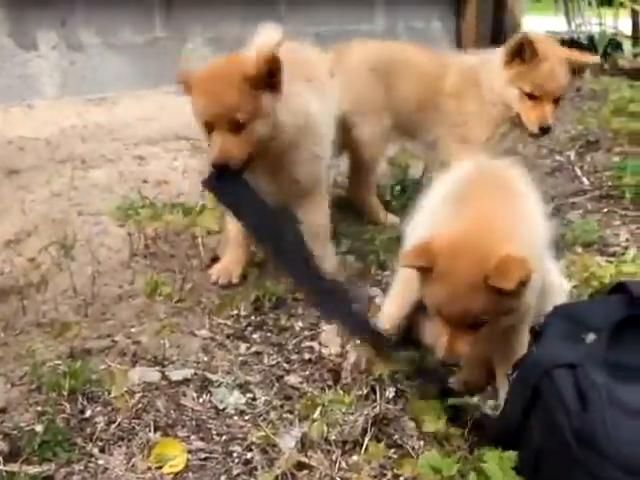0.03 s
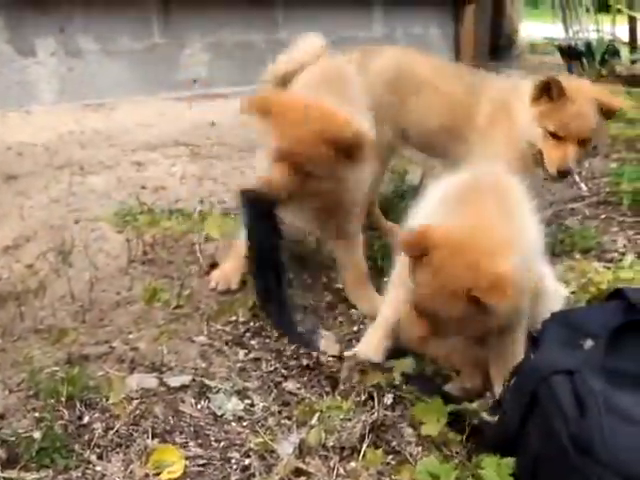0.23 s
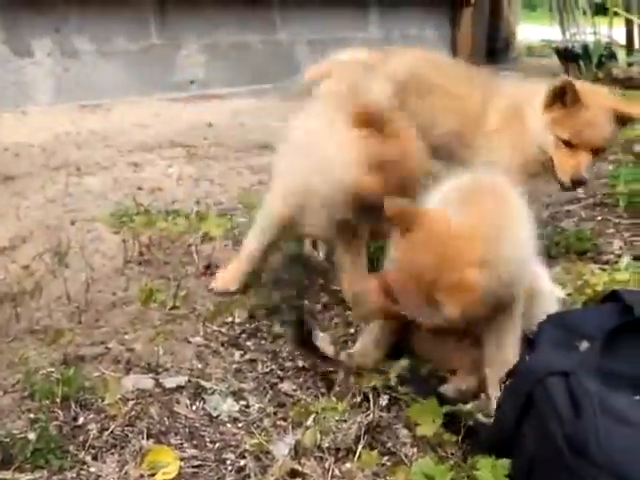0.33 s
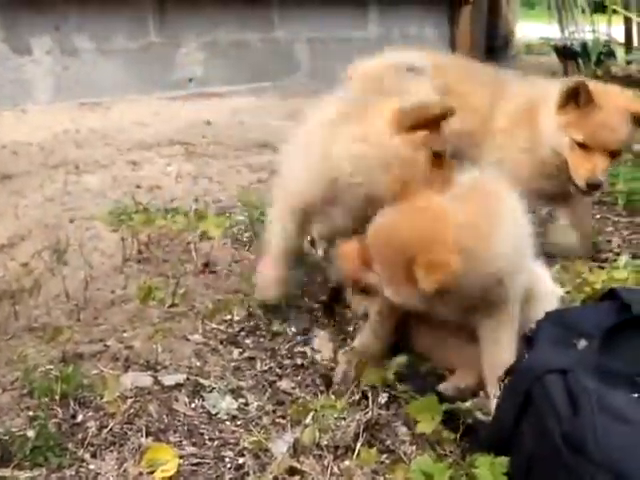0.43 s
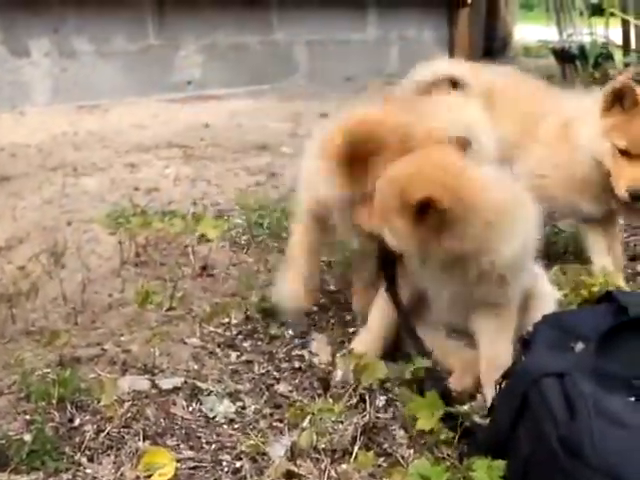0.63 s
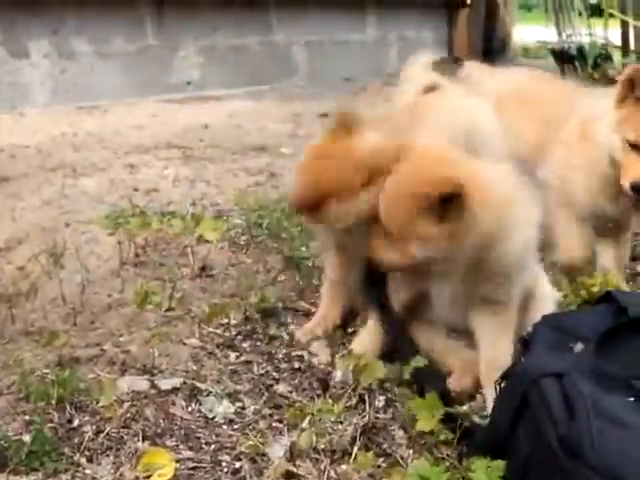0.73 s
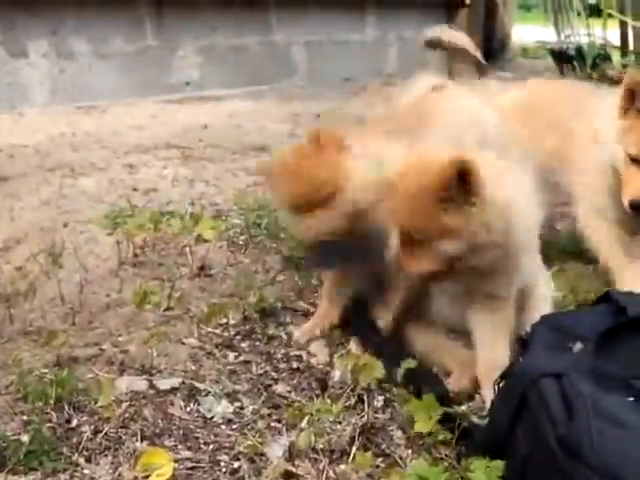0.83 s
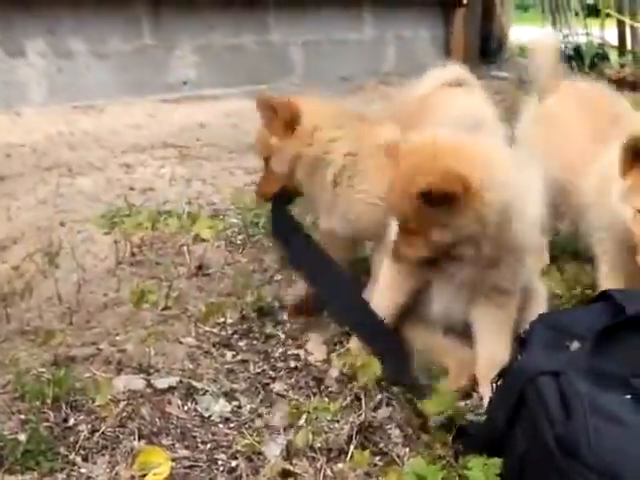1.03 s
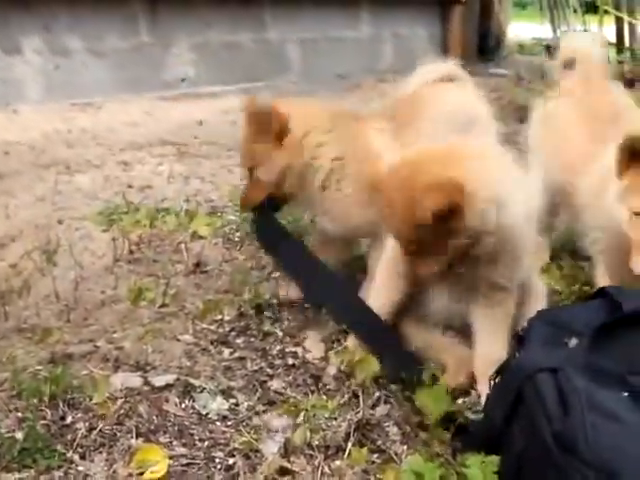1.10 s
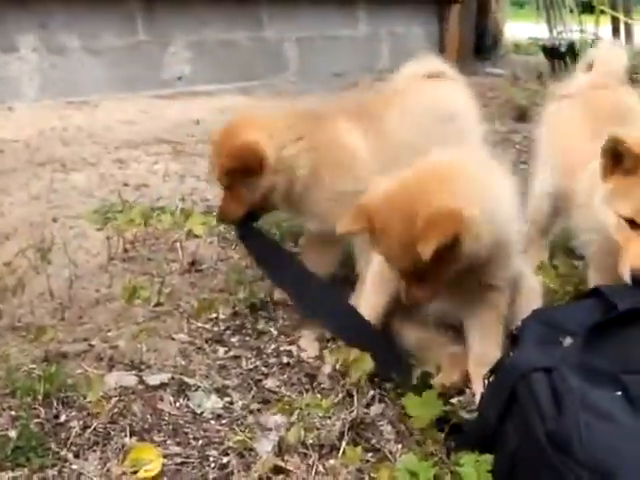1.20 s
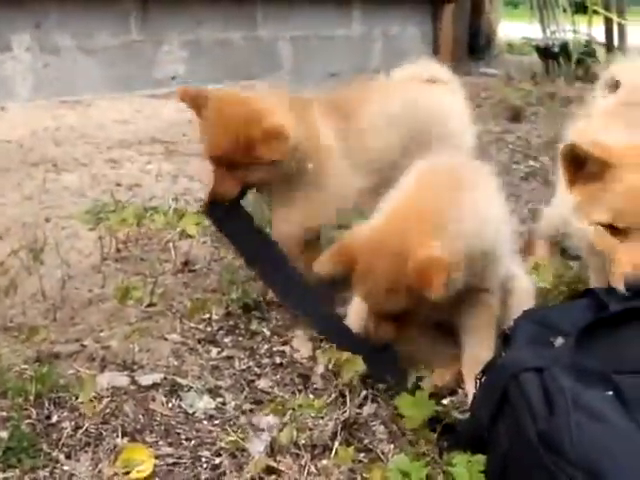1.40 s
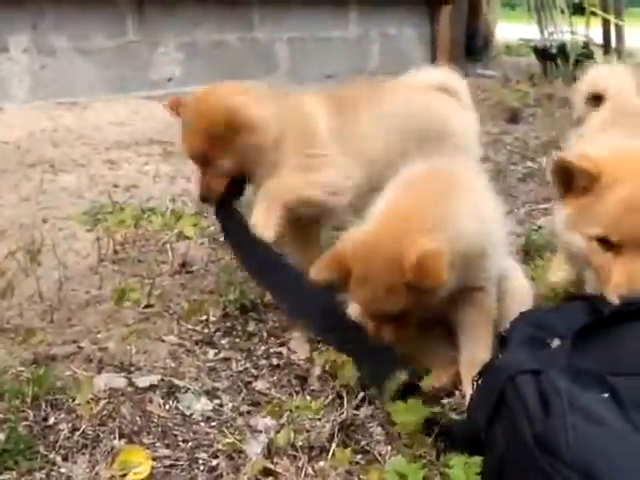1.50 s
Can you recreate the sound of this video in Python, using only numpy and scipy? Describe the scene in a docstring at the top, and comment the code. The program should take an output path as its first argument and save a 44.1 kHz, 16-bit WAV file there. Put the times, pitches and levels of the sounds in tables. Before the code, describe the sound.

Small twig cracks and leafy scuffs come from puppies' paws on the ground outdoors. Soft handling thumps and a low rumble sound right at the microphone early on and again later, while a high hiss continues behind.

```python
"""Twigs crack and dry leaves scuff under the paws of puppies tugging at a bag strap outdoors.
Right at the microphone come two clusters of dull bumps, probably from handling: soft pushes that
ring the camera body, over a low rubbing rumble. Down on the ground each twig breaks with a click
and a short woody ring, and the leaves crackle in many tiny fractures. A steady airy hiss lies behind."""
import sys
import numpy as np
from scipy.fft import rfft, irfft, next_fast_len
from scipy.io import wavfile

SR = 44100
rng = np.random.default_rng(int(sys.argv[2]) if len(sys.argv) > 2 else 0)


def wrap_up_sound(samples):
    """Save the sound to the file named by the first command line argument, as 16-bit audio."""
    columns = np.atleast_2d(samples).T
    # keep every value between -1 and 1, then stretch to whole-number steps
    tamed = np.clip(columns, -1, 1)
    steps = np.round(tamed * 32767).astype(np.int16)
    wavfile.write(sys.argv[1], SR, steps)


N = 68355

# Dull bumps close to the microphone. Each row: time in seconds, level in dB, pitch in Hz.
BUMPS = [(0.1467, -24, 251), (0.1646, -30.5, 166), (0.173, -25, 100), (0.2028, -3, 280.8),
         (0.2102, -8, 259), (.2249, -10, 260), (0.2273, -7, 201), (0.2346, -9, 200), (.2426, -21, 174),
         (.2516, -23, 328), (.2574, -23, 380), (0.3153, -21, 177), (0.4119, -23.5, 205), (1.0862, -19, 156),
         (1.1191, -22, 260), (1.1279, -7.5, 267), (1.133, -15.5, 292), (1.1378, -9.5, 195),
         (1.1425, -18, 173.4), (1.1495, -14.5, 228), (1.1807, -27.5, 171), (1.21, -17, 205.2),
         (1.2176, -21, 124)]
# Ring of the camera body. Each row: frequency in Hz, dB against the bump, t60 in seconds.
BODY_MODES = [(117, -15, 0.082), (288, -20, 0.057), (403, -19.5, 0.023), (551, -21, 0.025),
              (660, -38.5, 0.036)]
BUMP_REBOUND, BODY_ATTACK_S = 0.42, 0.00066
# Close rubbing. Each row: start in seconds, length in seconds, rms level in dB, tilt in dB per octave.
RUBS = [(0.013, 0.021, -40, 6.5), (0.06, 0.024, -45, -4.5), (0.134, 0.039, -39, -1),
        (0.194, 0.054, -24.5, 5.5), (0.263, .16, -36, -4), (.45, 0.041, -50, -9),
        (0.848, 0.023, -50.5, -0.5), (0.99, .05, -52, 5.5), (1.059, .04, -38.5, 2.5),
        (1.099, 0.073, -32, -4), (1.21, 0.094, -46.5, -5.5), (1.324, 0.0227, -39.5, -3),
        (1.379, 0.039, -48.5, 3)]
# Colour of the rubbing before its tilt. Each row: frequency in Hz, level in dB.
RUB_COLOUR = [(15, -24), (35, -9.5), (80, 2.5), (135, -1.5), (250, -7), (400, -14), (700, -31.5),
              (1500, -82)]
RUB_ATTACK_S, RUB_RELEASE_T60_S, RUB_PIVOT_HZ = 0.0074, 0.071, 150

# Twigs and stalks cracking underfoot.
# Each row: start in seconds, level in dB, centre in Hz, woody ring in dB against the crack.
SNAPS = [(.006, -25, 1550, -20.5), (0.01, -30, 6000, -41), (0.0245, -22, 1270, -35), (.028, -32, 595, -35),
         (0.264, -15, 12000, -44), (0.489, -31, 12000, -40), (0.723, -33, 1200, -28),
         (.981, -30, 4500, -12), (0.9861, -19, 1900, -37), (0.9867, -13.5, 4400, -28),
         (0.993, -12.5, 5800, -25.5), (1.0115, -23, 6500, -30.5), (1.395, -34.5, 400, -13)]
# Woody ring of a twig. Each row: frequency in Hz, relative level in dB, t60 in seconds.
TWIG_MODES = [(1780, 6.5, 0.028), (1200, -13, .025), (1647, -4.5, 0.043)]
SPLINTER_DB, SPLINTER_T60_S = -11, 0.0047  # level against the break
CRUMB_DB, CRUMB_T60_S = -30, 0.05  # level against the break
# Paws scuffing the leaves.
# Each row: middle in seconds, length in seconds, level in dB, centre in Hz, width in octaves.
SCUFFS = [(.025, .04, -46, 7000, .8), (0.032, 0.09, -56.5, 920, 1.3), (0.091, 0.055, -42, 4870, 2.2),
          (0.259, 0.0034, -35, 10850, 0.9), (.475, 0.036, -45, 9000, .8), (0.56, 0.032, -45, 3570, 1.4),
          (0.619, 0.046, -41, 6960, 1.25), (0.744, 0.065, -53, 1200, 0.94),
          (.762, 0.0056, -32.5, 7000, 2.2), (0.769, 0.0058, -32, 10000, 0.96),
          (0.898, 0.033, -38.5, 7040, 1.6), (.995, 0.0031, -36.5, 3000, 2.3),
          (0.999, 0.031, -36, 6000, 1.55), (1.074, 0.089, -46, 4000, 1.5), (1.305, 0.064, -44, 6470, 1.2),
          (1.43, 0.086, -47, 1390, 0.9)]
SCUFF_GRAINS_PER_S, GRAIN_SPREAD_DB = 5100, 1.5
LITTER_DB, LITTER_TICKS_PER_S = -57, 270
# Treble loss of the sounds from the ground. Each row: frequency in Hz, gain in dB.
GROUND_TREBLE = [(7000, -2), (10000, -5.5), (12000, -22), (16000, -18)]

# Colour of the high background hiss. Each row: frequency in Hz, level in dB.
HISS_COLOUR = [(1470, -36), (2500, -8.5), (3600, -10), (4300, -6), (5100, -2.5), (6000, 1.5), (6700, 3),
               (7700, -2), (8700, -11), (10200, -15), (11400, -22.5), (14000, -26), (15700, -32.5)]
# Slow drift of the hiss. Each row: time in seconds, level in dB before the trim.
HISS_DRIFT = [(0.0, -40.5), (0.202, -44.5), (0.414, -45), (0.754, -43), (1.55, -44.5)]
# Colour of the open air. Each row: frequency in Hz, level in dB.
AIR_COLOUR = [(30, -3), (70, 6.5), (130, 10), (250, -2), (500, -2), (1000, -3), (2000, -3), (3000, -14.5),
              (5000, -5), (12000, -40)]
HISS_TRIM_DB, AIR_DB = 0.5, -51
BAND_LIMIT_HZ = 15830


def bumps():
    """Close to the microphone, each soft contact pushes, rebounds and briefly rings the camera body."""
    out, now = np.zeros(N), np.arange(N) / SR
    for at, db, hz in BUMPS:
        phase = np.pi * hz * (now - at)
        push = (2 * phase ** 2 - 1 + 2 * BUMP_REBOUND * phase) * np.exp(-phase ** 2)
        age = np.maximum(now - at, 0)
        attack = 1 - np.exp(-(age / BODY_ATTACK_S) ** 2)
        out += amp(db) * (push + attack * ring(BODY_MODES, age))
    return out


def rubbing():
    """Low rubbing around the bumps: each stretch starts quickly, holds and dies away."""
    out, now = np.zeros(N), np.arange(N) / SR
    for start, length, db, tilt in RUBS:
        attack = np.clip((now - start) / RUB_ATTACK_S, 0, 1)
        release = amp(-60 * np.maximum(now - start - length, 0) / RUB_RELEASE_T60_S)
        colour = [(hz, level + tilt * np.log2(hz / RUB_PIVOT_HZ)) for hz, level in RUB_COLOUR]
        out += amp(db) * attack * release * noise(colour)
    return out


def twig_snaps():
    """A twig gives under a paw: one clean break, brief splintering, a spray of crumbs, a woody ring."""
    out, now = np.zeros(N), np.arange(N) / SR
    for start, db, hz, ring_db in SNAPS:
        age = np.maximum(now - start, 0)
        click = np.arange(N) == round(start * SR)
        splinters = amp(SPLINTER_DB - 60 * age / SPLINTER_T60_S)
        crumbs = amp(CRUMB_DB - 60 * age / CRUMB_T60_S)
        debris = (now >= start) * (splinters + crumbs) * rng.standard_normal(N)
        crack = band(click + debris, hz, octaves=0.92)
        out += amp(db) * (crack / np.abs(crack).max() + amp(ring_db) * ring(TWIG_MODES, age))
    return out


def leaves():
    """Dry leaves fracture on the ground: sparse ticks throughout, swells of crackle under the paws."""
    now = np.arange(N) / SR
    ticks = band(grains(LITTER_TICKS_PER_S), centre_hz=4000, octaves=0.79)
    out = amp(LITTER_DB) * unit(ticks)
    for middle, length, db, hz, octaves in SCUFFS:
        swell = np.exp(-2 * ((now - middle) / length) ** 2)
        crackle = band(grains(SCUFF_GRAINS_PER_S), hz, octaves)
        out += amp(db) * swell * unit(crackle)
    return out


def outdoor_air():
    """In the background, a high hiss drifts a little in level over faint open air."""
    drift_db = np.interp(np.arange(N) / SR, *np.transpose(HISS_DRIFT))
    hiss = amp(drift_db + HISS_TRIM_DB) * noise(HISS_COLOUR)
    return hiss + amp(AIR_DB) * noise(AIR_COLOUR)


def grains(per_s):
    """Tiny fractures: clicks of random time, sign and size."""
    hits = rng.random(N) < per_s / SR
    signs = np.sign(rng.standard_normal(N))
    return hits * signs * amp(GRAIN_SPREAD_DB * rng.standard_normal(N))


def ring(modes, age):
    """Damped modes, age seconds after a blow."""
    return sum(amp(db - 60 * age / t60) * np.sin(2 * np.pi * hz * age) for hz, db, t60 in modes)


def noise(colour):
    """Noise of rms 1 with a (Hz, dB) colour."""
    return unit(coloured(rng.standard_normal(N), colour))


def coloured(x, colour):
    """x through a gain curve of (Hz, dB) points."""
    points_hz, db = np.transpose(colour)
    return filtered(x, lambda hz: amp(np.interp(np.log(hz + 1), np.log(points_hz + 1), db)))


def band(x, centre_hz, octaves):
    """A broad bell-shaped band of x."""
    return filtered(x, lambda hz: np.exp(-.5 * (np.log2((hz + 1) / centre_hz) / octaves) ** 2))


def filtered(x, response):
    """x with its spectrum multiplied by response(hz)."""
    size = next_fast_len(len(x) + 8192)
    return irfft(rfft(x, size) * response(np.fft.rfftfreq(size, 1 / SR)), size)[:len(x)]


def amp(db):
    """Decibels to gain."""
    return 10 ** (np.asarray(db) / 20)


def unit(x):
    """Scale to rms 1."""
    return x / np.sqrt(np.mean(x ** 2) + 1e-20)


def scene():
    """One microphone outdoors: bumps and rubbing up close, paws on the ground, air behind."""
    close = bumps() + rubbing()
    ground = coloured(twig_snaps() + leaves(), GROUND_TREBLE)
    return (close + ground + outdoor_air())[None]


def record(dry):
    """The camera keeps nothing above its band limit."""
    return filtered(dry[0], lambda hz: hz < BAND_LIMIT_HZ)[None]


dry = scene()
out = record(dry)
wrap_up_sound(out)
```